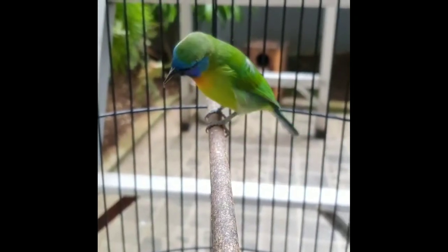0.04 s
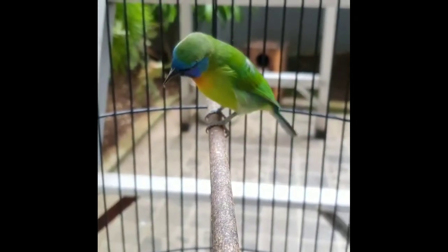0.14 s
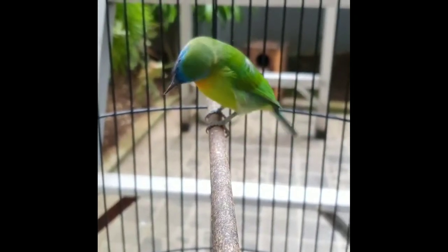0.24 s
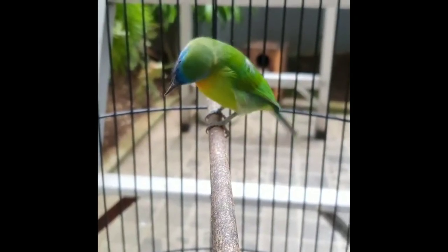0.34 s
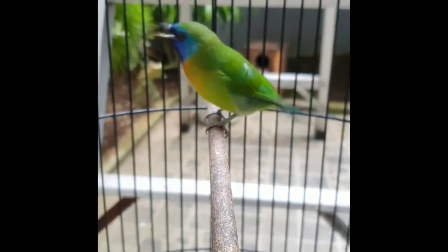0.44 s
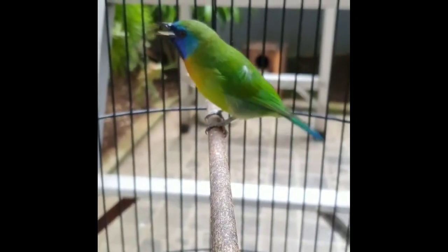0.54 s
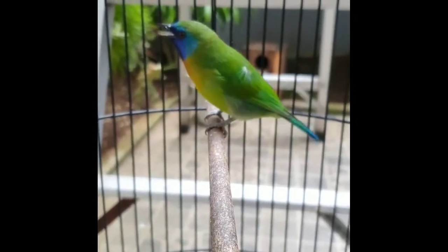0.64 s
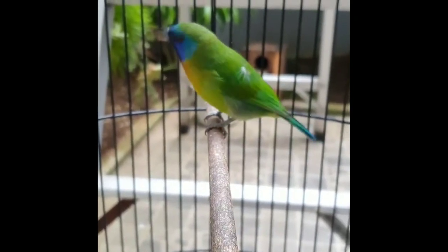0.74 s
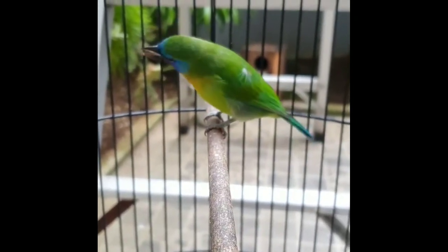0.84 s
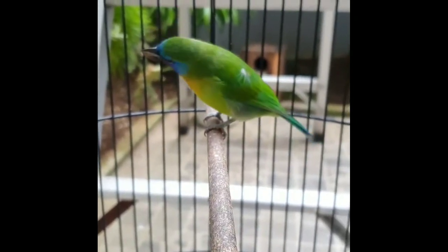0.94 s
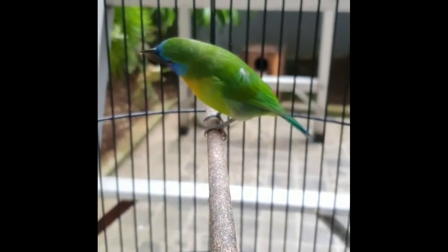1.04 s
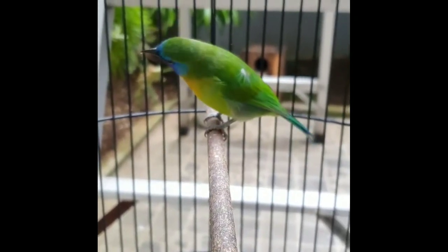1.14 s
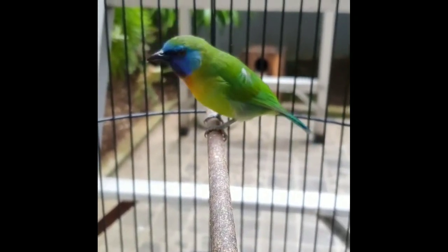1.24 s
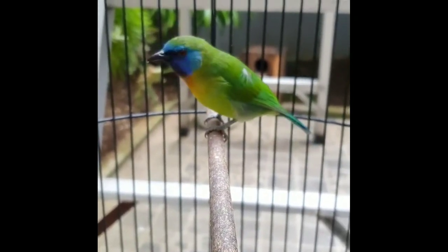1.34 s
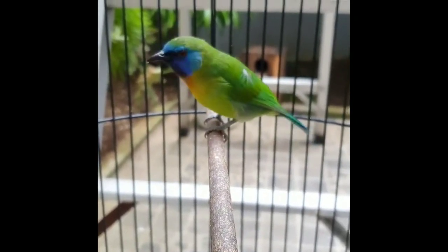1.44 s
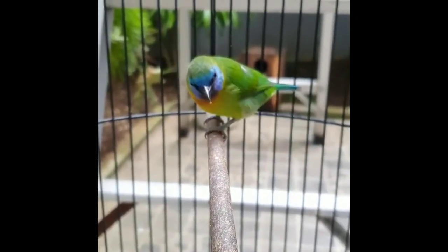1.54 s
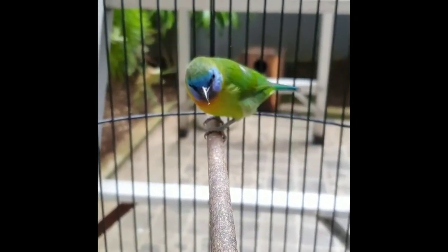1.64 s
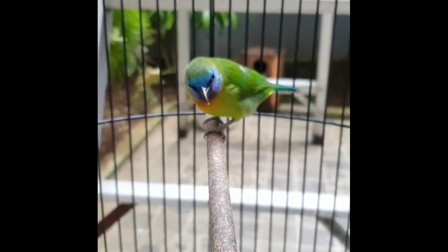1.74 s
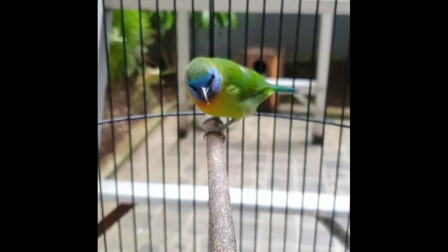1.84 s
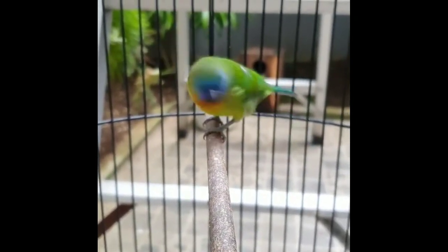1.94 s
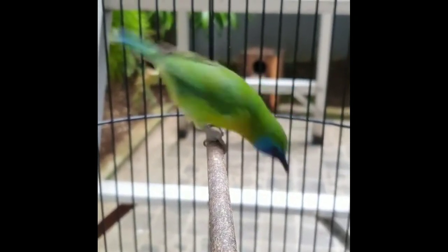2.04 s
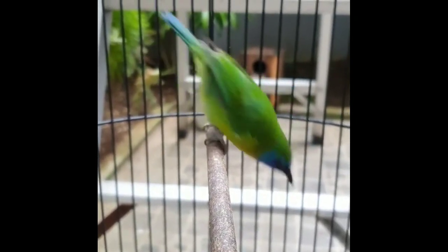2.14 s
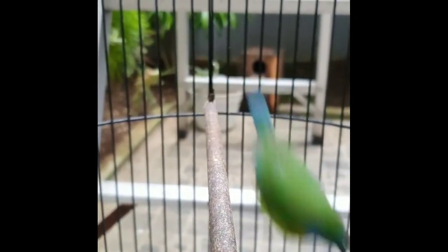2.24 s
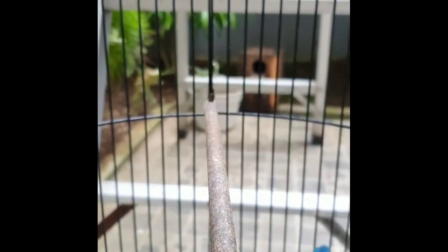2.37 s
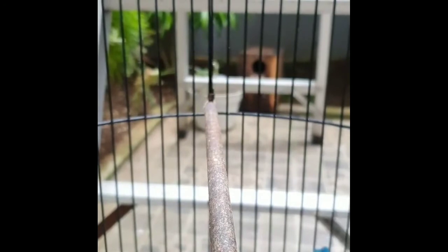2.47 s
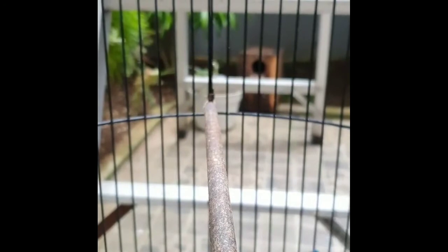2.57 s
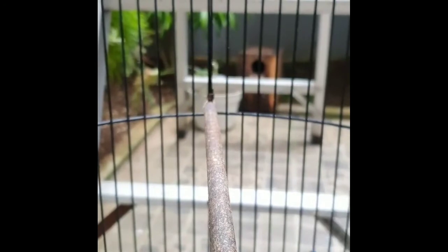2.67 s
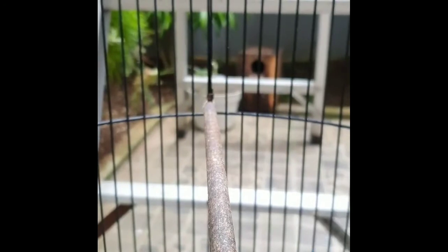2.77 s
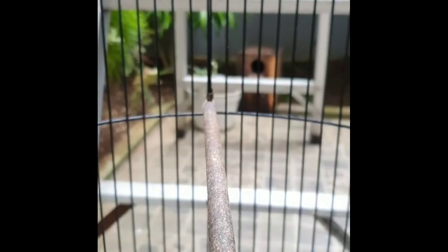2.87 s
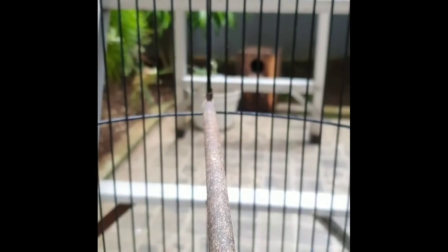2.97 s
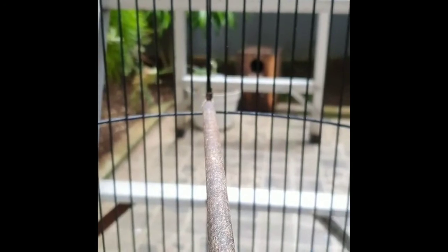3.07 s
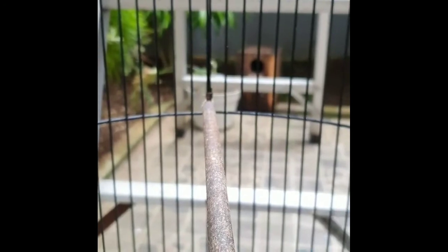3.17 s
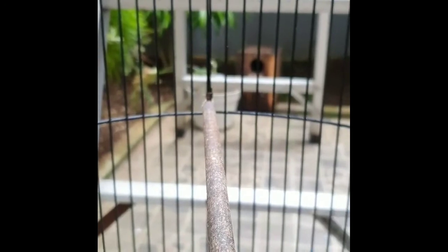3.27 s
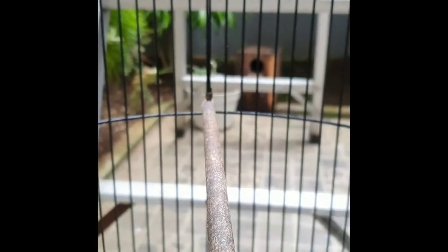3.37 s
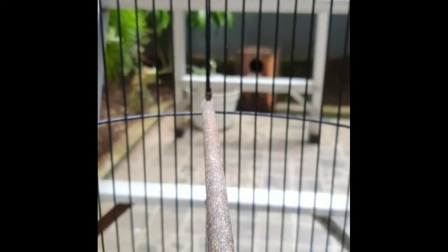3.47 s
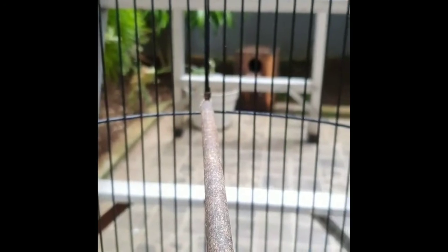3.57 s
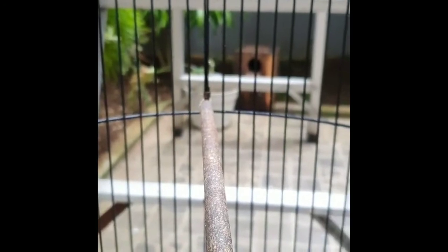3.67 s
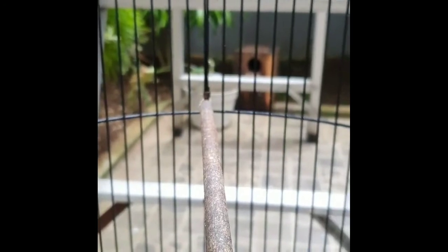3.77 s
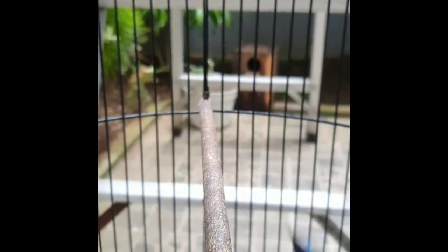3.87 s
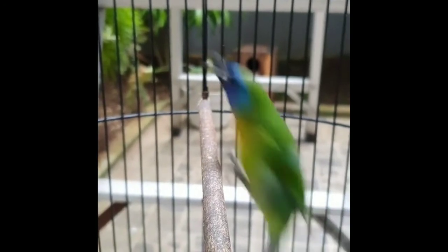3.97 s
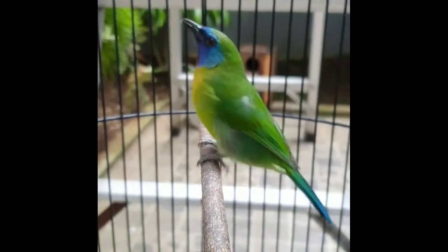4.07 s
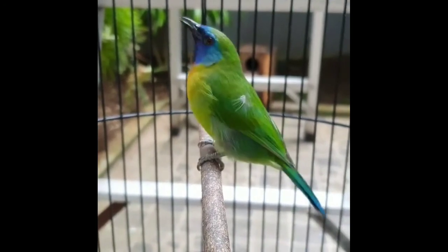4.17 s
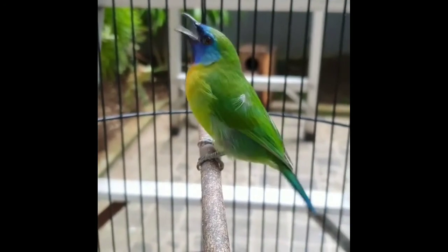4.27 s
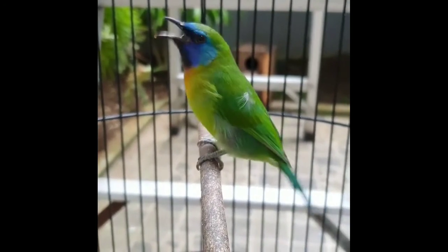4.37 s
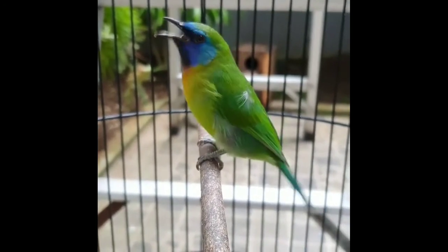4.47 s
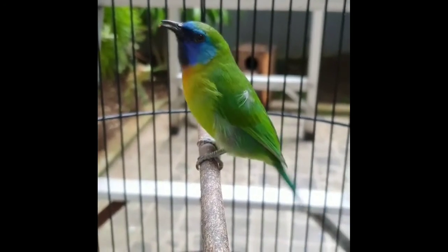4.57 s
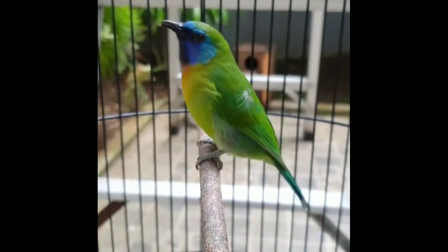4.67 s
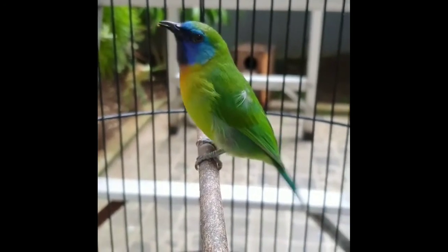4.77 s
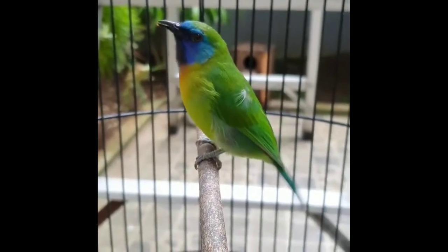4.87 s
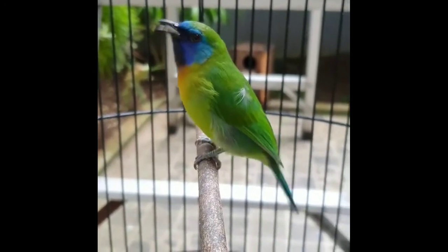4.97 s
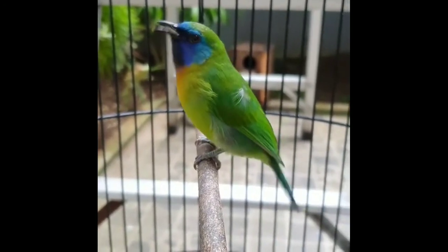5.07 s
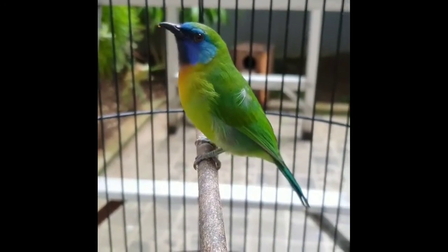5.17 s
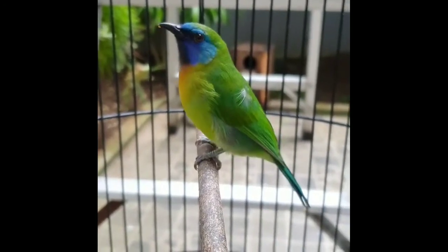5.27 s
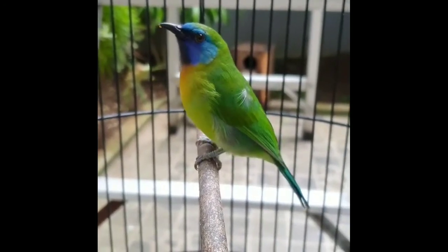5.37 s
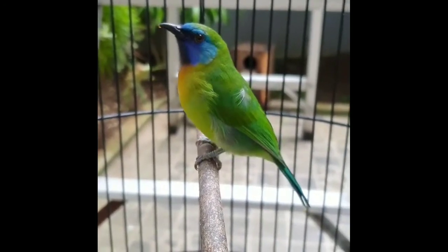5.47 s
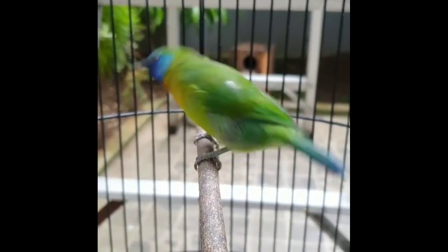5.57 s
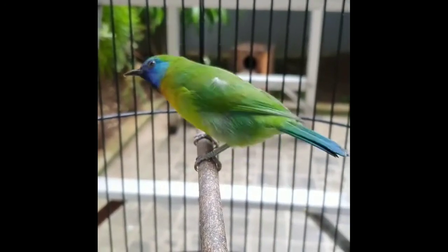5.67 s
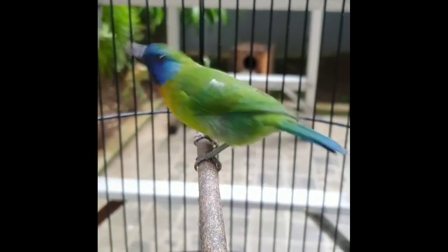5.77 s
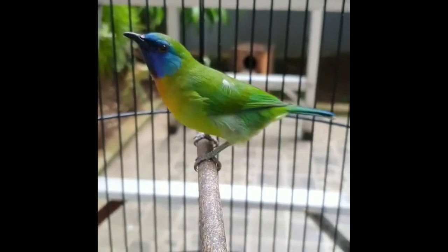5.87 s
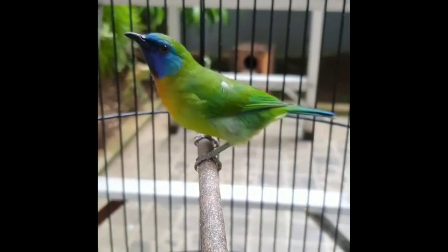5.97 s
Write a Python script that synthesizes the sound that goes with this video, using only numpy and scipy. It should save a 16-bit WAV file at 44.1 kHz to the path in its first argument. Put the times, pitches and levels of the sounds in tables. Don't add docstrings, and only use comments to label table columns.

```python
import sys
import numpy as np
from scipy import signal
from scipy.io import wavfile
from scipy.ndimage import uniform_filter1d

SR = 44100
rng = np.random.default_rng(int(sys.argv[2]) if len(sys.argv) > 2 else 0)


def convert_level_to_amplitude(level_db):
    exponent = np.asarray(level_db, float) / 20
    return 10 ** exponent


def unload_audio(sound):
    columns = np.transpose(np.atleast_2d(sound))
    steps = np.round(np.clip(columns, -1, 1) * 32767)
    wavfile.write(sys.argv[1], SR, steps.astype(np.int16))


N = 265482


def rms_one(x):
    return x / np.sqrt(np.mean(x ** 2) + 1e-20)


def in_time(rows):
    s, *columns = np.transpose(rows)
    return [np.interp(np.arange(N) / SR, s, c) for c in columns]


def at_hz(points, hz):
    points_hz, values = np.transpose(points)
    return np.interp(np.log(hz), np.log(points_hz), values)


def drift(rate_hz):
    r = np.exp(-2 * np.pi * rate_hz / SR)
    wander = signal.lfilter([1], [1, -2 * r, r * r], rng.standard_normal(N + SR))
    return rms_one(wander[SR:])


def add(out, s, sound):
    i = max(round(s * SR), 0)
    out[i:i + len(sound)] += sound[:N - i]


def band_pass(x, low_hz, high_hz, order=2):
    return signal.sosfilt(signal.butter(order, [low_hz, high_hz], "band", fs=SR, output="sos"), x)


def resonances(x, modes):
    out = 0
    for k, (hz, width_hz, db) in enumerate(modes):
        r = np.exp(-np.pi * width_hz / SR)
        b = [(1 - r * r) / 2, 0, (r * r - 1) / 2]
        a = [1, -2 * r * np.cos(2 * np.pi * hz / SR), r * r]
        peak = signal.lfilter(b, a, signal.lfilter(b, a, x))
        out = out + (-1) ** k * convert_level_to_amplitude(db) * peak
    return rms_one(out)


def banded_noise(spectrum, patchy_db):
    # (frequency [Hz], correlation [-1..1])
    likeness = [(40, 0.97), (250, 0.78), (1000, 0.2), (4000, .1)]
    out, edges_hz = 0, 20 * 2 ** np.arange(0, 9.1, .5)
    white = rng.standard_normal((2, 2, N))
    for k, (low_hz, high_hz) in enumerate(zip(edges_hz, edges_hz[1:])):
        mid, side = band_pass(white[k % 2], low_hz, high_hz)
        centre_hz = np.sqrt(low_hz * high_hz)
        alike = np.clip(at_hz(likeness, centre_hz), -1, 1)
        gain = convert_level_to_amplitude(at_hz(spectrum, centre_hz) + patchy_db * drift(9.3))
        out = out + gain * (np.sqrt(1 + alike) * mid + np.sqrt(1 - alike) * side * [[1], [-1]])
    return rms_one(out)


def porch(x, direct_db, wet_db, left_db, lag_s, gap_s, tilt_db=0):
    # (frequency [Hz], time to fall 60 dB [s])
    t60 = [(1500, 0.56), (3000, 0.42), (6000, .38), (12000, 0.33)]
    t, tail = np.arange(SR) / SR, 0
    edges_hz = 300 * 2 ** np.arange(0, 6.1, .75)
    white = rng.standard_normal((2, SR))
    for low_hz, high_hz in zip(edges_hz, edges_hz[1:]):
        hz = np.sqrt(low_hz * high_hz)
        decay = convert_level_to_amplitude(tilt_db * np.log2(hz / 4000) - 60 * t / at_hz(t60, hz))
        tail = tail + band_pass(white, low_hz, high_hz) * decay
    tail = tail * np.clip(t / gap_s, 0, 1)
    tail = tail / np.sqrt(np.sum(tail ** 2) / 2)
    wet = signal.fftconvolve(x[None], tail, axes=1)[:, :N]
    lagged = np.interp(np.arange(N) - lag_s * SR, np.arange(N), x)
    pan = convert_level_to_amplitude(np.array([[left_db], [-left_db]]) / 2)
    return (convert_level_to_amplitude(direct_db) * np.array([x, lagged]) + convert_level_to_amplitude(wet_db) * wet) * pan


def gliding_notes(rows, partials, settle, attack_s):
    out, tremble, flutter = np.zeros(N), 1.4 * np.tanh(drift(300.0)), np.tanh(drift(450.0))
    for s, from_hz, to_hz, length_s, db, wobble in rows:
        t, i = np.arange(round(length_s * SR)) / SR, round(s * SR)
        glide = 1 - np.exp(-t / (settle * length_s))
        pitch_hz = (from_hz + (to_hz - from_hz) * glide) * (1 + wobble * tremble[i:i + len(t)])
        phase = 2 * np.pi * np.cumsum(pitch_hz) / SR
        shape = np.clip(t / attack_s, 0, 1) * np.clip((length_s - t) / (0.1 * length_s), 0, 1)
        rough = convert_level_to_amplitude(45.0 * wobble * flutter[i:i + len(t)])
        tone = sum(convert_level_to_amplitude(d) * np.sin(k * phase) for k, d in partials)
        add(out, s, convert_level_to_amplitude(db) * shape * rough * tone)
    return out


def near_bird():
    # (time of highest pitch [s], top pitch [Hz], length of the fall [s],
    # peak level [dB], level at the top re peak [dB])
    first_phrase = [(-0.01, 6800, .024, -9, -14), (0.079, 7200, 0.018, -3, -11),
                    (0.173, 6900, 0.019, -1.5, -14), (0.284, 7200, 0.02, -3.5, -11.5),
                    (0.39, 7005, 0.019, -3.5, -11), (0.497, 6760, 0.021, -1, -9),
                    (0.596, 6700, 0.019, -1.5, -11), (0.702, 6750, 0.018, -1.5, -11),
                    (0.812, 6750, 0.019, -2, -11), (0.904, 6600, 0.019, -4.5, -6),
                    (1.008, 6500, 0.018, -1.5, -11)]
    second_phrase = [(4.044, 6600, 0.019, -2.5, -5.5), (4.19, 6990, 0.021, -1.5, -4),
                     (4.27, 7000, 0.011, -1, -3), (4.321, 7190, 0.014, -1, -4), (4.372, 7250, 0.012, 0, -4),
                     (4.422, 7050, 0.014, -1, -5), (4.475, 7050, 0.014, 0, -7),
                     (4.531, 6900, 0.015, -1, -8), (4.596, 6800, 0.018, 0, -12),
                     (4.683, 6660, 0.017, 0, -12), (4.788, 6855, 0.018, 0, -13),
                     (4.889, 6710, 0.017, 0, -11), (5.007, 6840, 0.02, 0, -9), (5.107, 6600, 0.018, 0, -10)]
    end_hz, upstroke_s, rounding_s = 1900, .007, .0025
    full_length_s, clipped_db_per_s = .016, 2500
    out, uneven = np.zeros(N), drift(330.0)
    breath = band_pass(rng.standard_normal(N), 1300, 9000, order=1)
    for s, top_hz, length_s, db, top_db in list(first_phrase) + list(second_phrase):
        fall_s = .005 + .45 * length_s
        t = np.arange(-round(.011 * SR), round((length_s + .015) * SR)) / SR
        away_s = np.sqrt(t ** 2 + rounding_s ** 2) - rounding_s
        shape = np.exp(-away_s / np.where(t < 0, upstroke_s, fall_s))
        phase = 2 * np.pi * np.cumsum(end_hz + (top_hz - end_hz) * shape) / SR
        tail_db = -10 - clipped_db_per_s * max(full_length_s - length_s, 0)
        moments_s = [t[0], t[0] + .002, -.004, .002,
                     .35 * length_s, .65 * length_s, length_s - .003, length_s, t[-1]]
        levels_db = [-70, 1.6 * top_db - 15, 1.5 * top_db - 1.5, top_db,
                     .5 * top_db, -.6, -.4, tail_db, tail_db - 16]
        start = round(abs(s) * SR)
        air = slice(start, start + len(t))
        gain = convert_level_to_amplitude(db + np.interp(t, moments_s, levels_db) + 2.3 * uneven[air])
        chirp = gain * (np.sin(phase) + convert_level_to_amplitude(-33) * np.sin(2 * phase))
        chirp += gain * convert_level_to_amplitude(-24) * breath[air]
        add(out, s + t[0], chirp[max(0, -round((s + t[0]) * SR)):])
    return out


def far_bird():
    # (time [s], end pitch [Hz], length [s], level [dB])
    chatter = [(0.002, 2912, 0.047, -22), (0.14, 2784, 0.059, -24), (0.265, 2900, 0.068, -21.5),
               (0.39, 2830, 0.068, -22.5), (0.52, 2786, 0.059, -24), (0.645, 2930, 0.065, -26),
               (0.775, 3017, 0.05, -21), (0.89, 3214, 0.039, -17), (1.13, 3150, .045, -23.5),
               (1.255, 3167, 0.043, -21.5), (1.383, 3095, 0.04, -22.5), (1.493, 3177, 0.057, -28.5),
               (1.608, 3070, 0.044, -19), (1.743, 3090, 0.049, -19.5), (1.853, 3200, 0.061, -22.5),
               (2.0, 2728, 0.034, -20.5), (2.212, 3170, 0.04, -20.5), (2.303, 3100, 0.031, -17.5),
               (2.403, 3303, 0.055, -21.5), (2.495, 3206, 0.063, -20.5), (2.597, 3313, 0.037, -17.5),
               (2.688, 3217, 0.028, -22), (2.79, 3100, 0.024, -31), (2.882, 2813, 0.016, -19.5),
               (2.978, 2907, 0.022, -29.5), (3.06, 2970, 0.013, -28.5), (3.148, 2880, 0.019, -31.5)]
    # (multiple of pitch [1], level [dB])
    reed = [(1, -1.5), (1.5, -14), (2, 3.7), (2.5, -10), (3, -16), (4, -14)]
    steady_db, tremble_per_db = -13, .012
    rows = []
    for s, hz, length_s, db in chatter:
        wobble = max(tremble_per_db * (steady_db - db), 0)
        if 2.1 < s < 2.75:
            wobble *= .6
        rows.append((s, .77 * hz, hz, length_s, db, wobble))
    high_pass = signal.butter(6, 2200, "high", fs=SR, output="sos")
    return signal.sosfilt(high_pass, gliding_notes(rows, reed, 0.26, 0.0046))


def street_rumble():
    # (time [s], level [dB])
    swell = [
        (0.0, -49),
        (1.32, -46),
        (2.45, -44.5),
        (3.05, -47.5),
        (3.8, -43),
        (4.15, -47.5),
        (6.02, -50.5),
    ]
    # (frequency [Hz], density [dB per Hz])
    spectrum = [(12, -51), (30, -25), (54, -2.5), (108, -3.5), (133, -9), (171, -7.5), (488, -44),
                (681, -20), (949, -24), (1140, -24.5), (1670, -38), (2150, -25.5), (9000, -101),
                (11700, -95), (19800, -120)]
    return convert_level_to_amplitude(in_time(swell)[0] - 2.0) * banded_noise(spectrum, patchy_db=2.8)


def wing_puffs():
    # (time of peak [s], level [dB], time to rise 20 dB [s], time to fall 20 dB [s])
    beats = [(.69, -45, .4, .22), (.92, -47, .04, .03), (1.02, -37, .05, .1), (1.09, -31.5, .1, .15),
             (2.36, -48.5, .6, .7), (2.68, -42, .08, .3), (3.22, -46, .06, .8), (3.52, -33.5, .09, .2),
             (4.27, -53, .08, .06), (4.5, -60, .6, .15), (4.74, -38.5, .09, .11), (5.15, -55, .8, .6),
             (5.92, -33, .025, .25)]
    # (frequency [Hz], density [dB per Hz])
    spectrum = [(71, -71), (120, -9.5), (200, -5.5), (363, -2.5), (591, -1), (684, -9), (1640, -25),
                (2200, -14.5), (2860, -71), (4840, -120)]
    t, power, rustle_db = np.arange(N) / SR, 0, -60
    for s, db, rise_s, fall_s in beats:
        power = power + convert_level_to_amplitude(db - 20 * np.maximum((s - t) / rise_s, (t - s) / fall_s)) ** 2
    return np.sqrt(power + convert_level_to_amplitude(rustle_db) ** 2) * banded_noise(spectrum, patchy_db=2.5)


def third_bird():
    # (time [s], start pitch [Hz], end pitch [Hz], length [s], level [dB])
    chips = [(0.893, 6320, 5185, 0.031, -8.5), (2.108, 5750, 3800, 0.035, -16),
             (2.207, 5450, 3785, 0.026, -18.5), (2.302, 5170, 3530, 0.011, -14),
             (2.397, 5470, 4270, 0.024, -15), (2.492, 5450, 3680, 0.019, -12),
             (2.597, 5300, 3500, .02, -18), (2.688, 5200, 3500, .02, -18.5),
             (2.757, 4750, 5330, 0.016, -3.5), (5.03, 6290, 4950, 0.024, -9.5),
             (5.943, 7190, 5500, 0.008, -8), (5.959, 5150, 5400, 0.014, -5.5),
             (5.963, 5590, 6200, 0.013, -14.5)]
    # (multiple of pitch [1], level [dB])
    partials = [(1, 1.6), (2, -7.5), (3, -35.5)]
    # low, high [Hz]
    dip_hz = [7400, 9700]
    tremble = .021
    voice = gliding_notes([(*row, tremble) for row in chips], partials, 0.46, 0.0012)
    return signal.lfilter(*signal.butter(1, dip_hz, "stop", fs=SR), voice)


def hoots():
    # (time [s], start pitch [Hz], end pitch [Hz], length [s], level [dB])
    calls = [
        (2.17, 610, 630, .08, -58),
        (2.345, 545, 555, .06, -47),
        (2.42, 550, 580, .12, -56),
        (2.53, 160, 168, .18, -53),
        (2.61, 560, 545, .09, -54),
        (5.77, 1100, 1160, .12, -68),
    ]
    tremble = .008
    return gliding_notes([(*row, tremble) for row in calls], [(1, 0.1)], 0.74, 0.0084)


def rasp():
    # (time [s], level [dB], brightness [dB])
    course = [
        (3.145, -53, -3.5),
        (3.206, -21, -10),
        (3.278, -15, -3),
        (3.51, -17, -9),
        (3.712, -28.5, -12),
        (3.962, -52, -13),
        (4.02, -85.5, -5),
    ]
    # (frequency [Hz], width [Hz], level [dB])
    low_modes = [(2520, 457, 1), (3250, 700, -2), (1860, 580, -24.5), (1200, 1200, -26.5), (4400, 300, -15)]
    high_modes = [(6600, 1000, 11.8), (4180, 120, -7.5), (7900, 910, -2), (10600, 2700, -8),
                  (11200, 880, -12.0), (12960, 3200, -4.5)]
    level_db, bright_db = in_time(course)
    cycles = np.cumsum(230 * (1 + 0.22 * drift(60.0))) / SR
    pulses = .3 + np.exp(-4.0 * (cycles % 1))
    source = rng.standard_normal(N) * pulses * convert_level_to_amplitude(1.2 * drift(40.0))
    s = np.arange(N) / SR
    sounding = (s > course[0][0]) & (s < course[-1][0])
    voice = resonances(source, low_modes) + convert_level_to_amplitude(bright_db + 1.1) * resonances(source, high_modes)
    return sounding * convert_level_to_amplitude(level_db + 2.5) * voice


def scene():
    near = porch(near_bird(), -0.7, 0.0, left_db=2.8, lag_s=.00019, gap_s=0.003, tilt_db=0.8)
    far = porch(far_bird(), -3.0, 3.0, left_db=1.9, lag_s=0.00017, gap_s=0.0013)
    third = porch(third_bird(), -5.5, 3.17, left_db=1.5, lag_s=.0001, gap_s=0.0051)
    hoot = porch(hoots(), 3.5, -3.0, left_db=-1.7, lag_s=.0001, gap_s=.01)
    scold = porch(rasp(), -2.6, -2.2, left_db=-3.0, lag_s=.00007, gap_s=0.0096)
    return near + far + street_rumble() + wing_puffs() + third + hoot + scold


def thin_out(x, under_db, slope_db):
    frame = dict(fs=SR, window="cosine", nperseg=2048, noverlap=1024)
    bins = 20
    hz, _, z = signal.stft(x, **frame)
    power = abs(z) ** 2
    level_db = 10 * np.log10(uniform_filter1d(power, size=bins, axis=1)[:, ::bins] + 1e-14)
    steps = np.arange(level_db.shape[1])
    distance = abs(steps[:, None] - steps)[None, :, :, None]
    mask_db = np.max(level_db[:, None] - slope_db * distance, axis=2) - under_db
    luck_db = 8.0 * uniform_filter1d(rng.standard_normal(level_db.shape[1:]), size=3)
    mask_db = np.minimum(mask_db + luck_db, level_db.max(axis=1, keepdims=True) - 6.5)
    mask_db = np.repeat(mask_db, bins, axis=1)[:, :len(hz)]
    rise = np.diff(level_db[:, 4:].max(axis=(0, 1)), prepend=0) > 5
    keep = rise | np.roll(rise, 1) | (10 * np.log10(power + 1e-14) > mask_db) | (hz[:, None] < 1750)
    return signal.istft(z * keep, **frame)[1][:, :N]


def roll_off(x):
    return signal.sosfilt(signal.butter(12, 15610, fs=SR, output="sos"), x)


def record(dry):
    top_hz = 13600
    low_pass = signal.cheby2(10, 60, top_hz + 500, fs=SR, output="sos")
    thinned = thin_out(signal.sosfilt(low_pass, dry), under_db=0.3, slope_db=7.5)
    return roll_off(np.clip(thinned, -1, 1))


dry = scene()
out = record(dry)
unload_audio(out)
```